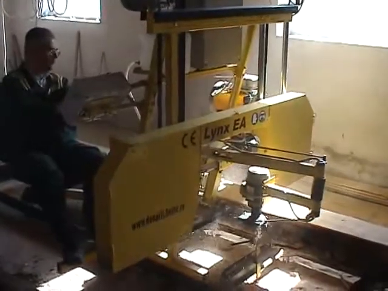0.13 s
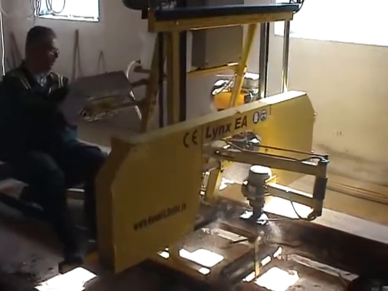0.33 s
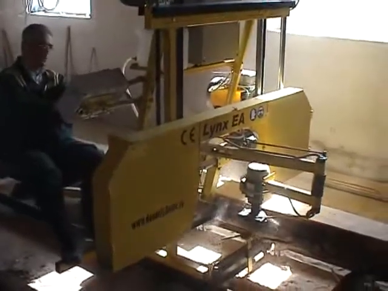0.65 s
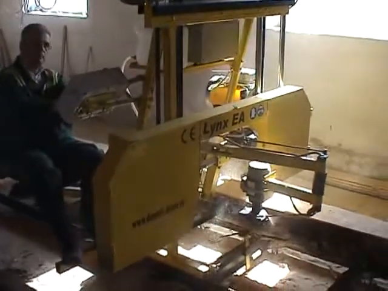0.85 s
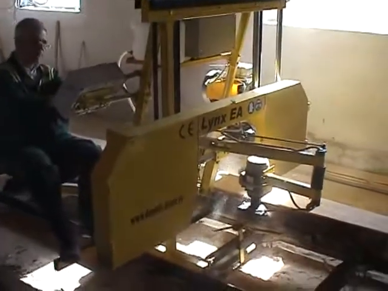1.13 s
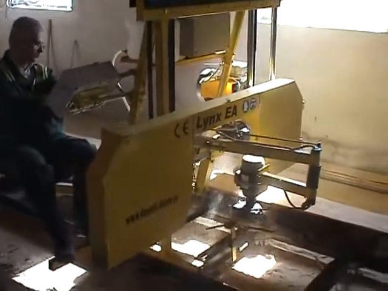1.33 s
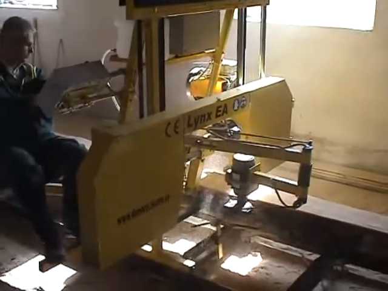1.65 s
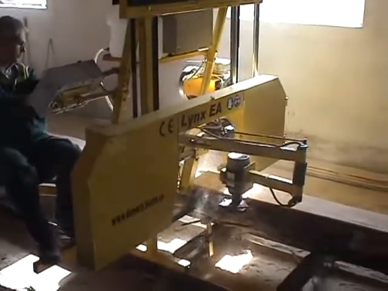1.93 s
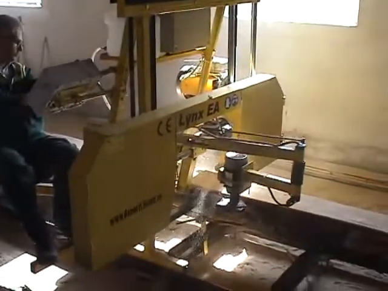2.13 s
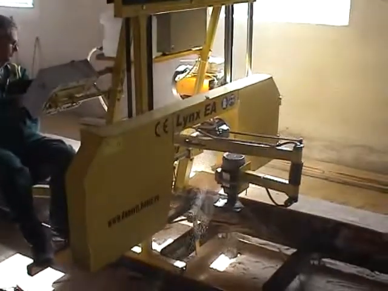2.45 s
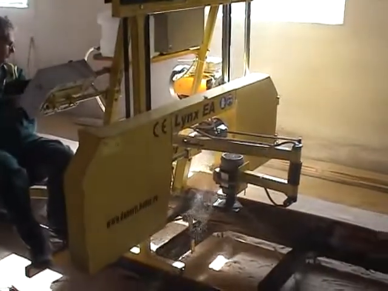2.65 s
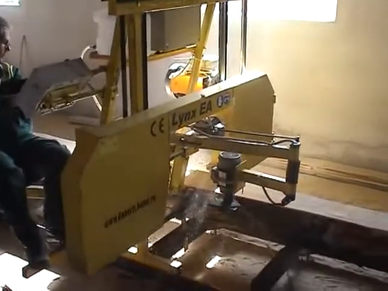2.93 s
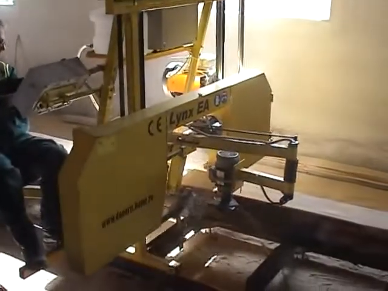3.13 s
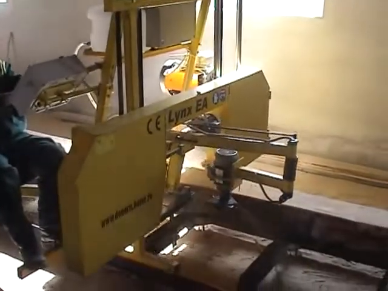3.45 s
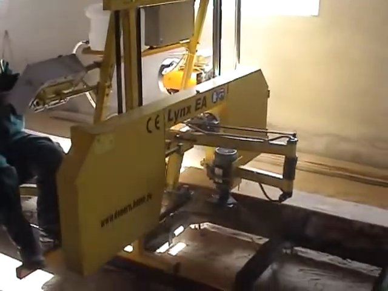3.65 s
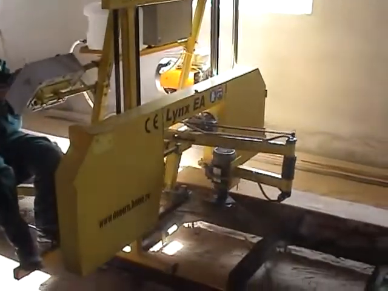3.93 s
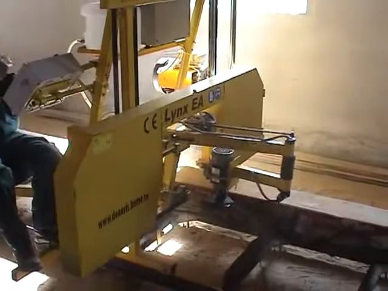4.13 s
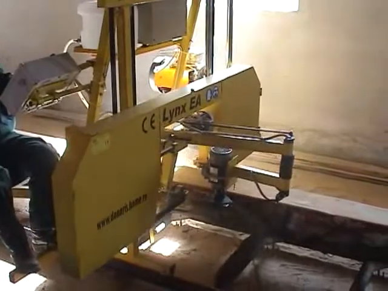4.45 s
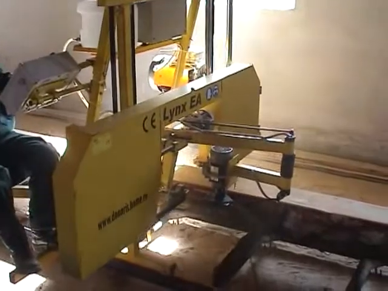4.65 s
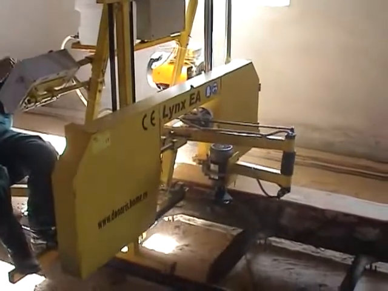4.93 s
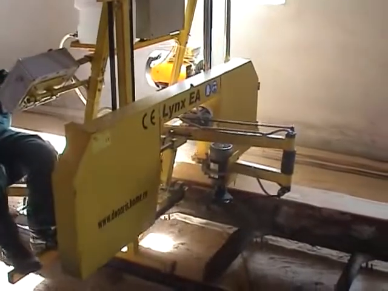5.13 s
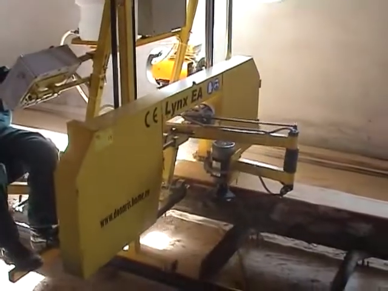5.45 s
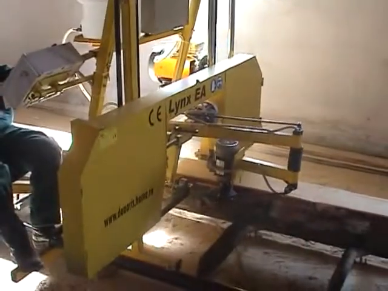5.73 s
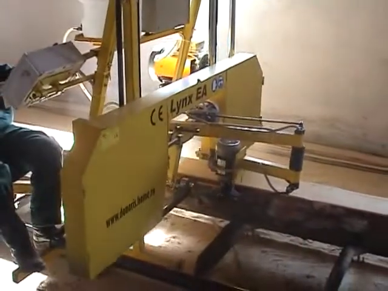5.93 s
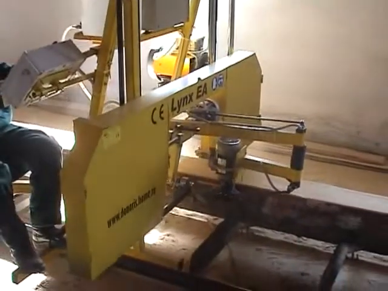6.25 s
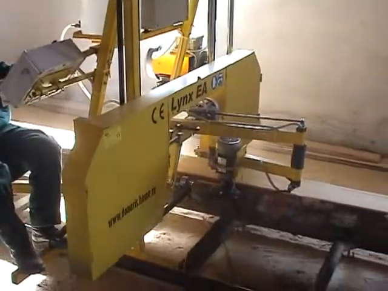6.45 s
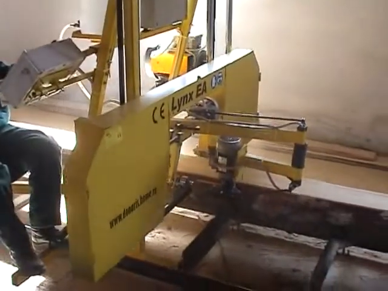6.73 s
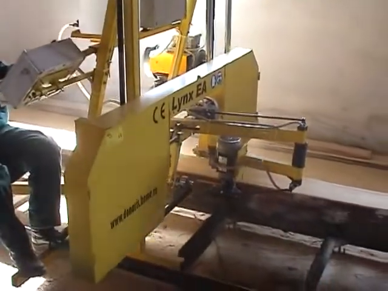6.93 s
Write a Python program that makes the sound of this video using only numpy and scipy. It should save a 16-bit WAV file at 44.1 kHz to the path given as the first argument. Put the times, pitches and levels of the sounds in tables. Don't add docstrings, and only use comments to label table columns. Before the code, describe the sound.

Continuous harsh, sizzling saw hiss indoors, with thin metallic squeals flickering through it and a soft low machine hum beneath.

```python
import sys
import numpy as np
from scipy import signal
from scipy.fft import rfft, irfft, next_fast_len
from scipy.io import wavfile
from scipy.ndimage import uniform_filter1d, map_coordinates

SR = 44100
rng = np.random.default_rng(int(sys.argv[2]) if len(sys.argv) > 2 else 0)


def ratio(d):
    e = np.asarray(d, float) / 20
    return 10 ** e


def digitize_waveform(pressure):
    field = np.atleast_2d(pressure).T
    bounded = np.clip(field, -1, 1)
    quanta = np.round(bounded * 32767).astype(np.int16)
    wavfile.write(sys.argv[1], SR, quanta)


N = 313109
PAD = next_fast_len(N)
HZ = np.maximum(np.arange(PAD // 2 + 1) * SR / PAD, 1)
EARS = np.array([[1], [-1]])
TEETH_PER_TURN = 8.354
HISS_DB = -15
# frequency in Hz, level in dB.
ROLLER_SHARE = [(140, -15), (260, -30), (600, -11), (1000, -20), (1700, -8), (2600, -12.5), (3500, -5.5),
                (5500, -4), (7000, -11.5), (9000, -14.5), (14000, -16)]


def rms_one(x):
    return x / np.sqrt(np.mean(x ** 2) + 1e-20)


def over_hz(points):
    hz, db = np.transpose(points)
    return ratio(np.interp(np.log(HZ), np.log(hz), db))


def drift(rate):
    knots = rng.standard_normal(400)
    place = np.arange(N // 64 + 2) * 64 / SR * rate
    coarse = map_coordinates(knots, [place], order=3, mode="wrap")
    return np.interp(np.arange(N) / 64, np.arange(len(coarse)), coarse)


def bell(t, middle, length):
    return np.exp(-8.0 * ((t - middle) / length) ** 2)


def turns():
    # time in seconds, first roller's rate in Hz, second's lag in Hz.
    speed = [(0, 137.86, 1.0), (.2, 137.8, 1.0), (.47, 136.35, 1.1), (.72, 138.0, 1.1), (1.2, 139.05, 1.2),
             (1.68, 139.8, 1.2), (2.2, 136.35, 1.8), (2.42, 137.9, 1.3), (2.72, 137.4, 1.2),
             (3.22, 139.25, 1.5), (3.6, 138.7, 1.6), (4.45, 138.9, 1.5), (4.75, 137.35, 1.2),
             (5.4, 139.25, 1.5), (5.76, 138.1, 1.4), (6.1, 138.95, 1.6), (6.36, 138.95, 1.2),
             (6.62, 137.7, 1.0)]
    inertia_s = 0.12
    s, rate, behind = np.transpose(speed)
    t = np.arange(N) / SR
    first, lag = np.interp(t, s, rate), np.interp(t, s, behind)
    return uniform_filter1d([first, first - lag], int(inertia_s * SR), axis=1, mode="nearest")


def roller(turns_hz, size=320, count=60):
    wear_per_s = 1.903
    running = np.concatenate([np.full(SR, turns_hz[0]), turns_hz])
    angle = np.cumsum(running) / SR
    phases = np.exp(2j * np.pi * rng.random((count, size // 2 + 1)))
    rims = rms_one(irfft(phases, size))
    wear = np.arange(N + SR) / SR * wear_per_s
    old = wear.astype(int)
    share = wear % 1 * np.pi / 2
    place = (angle % 1 * size).astype(int)
    return np.cos(share) * rims[old % count, place] + np.sin(share) * rims[(old + 1) % count, place]


def hall(x):
    t60_s, hall_db = 1, -2.5
    t = np.arange(SR) / SR
    tails = rng.standard_normal((2, SR)) * ratio(-60 * t / t60_s)
    tails /= np.sqrt(np.sum(tails ** 2, axis=1, keepdims=True))
    mid, side = signal.fftconvolve(x[None], tails, mode="full", axes=1)[:, SR:SR + N]
    direct_and_hall = (x[SR:] + ratio(hall_db) * mid) / np.hypot(1, ratio(hall_db))
    return np.array([direct_and_hall, side])


def near_echoes(x, count=6):
    echo_db, shortest_ms, longest_ms, wander_ms = -18, 0.786, 5.0, 0.083
    here, out = np.arange(N), x.copy()
    highs = np.diff(x, prepend=0)
    for lag_ms in rng.uniform(shortest_ms, longest_ms, count):
        lag = (lag_ms + wander_ms * drift(1.3)) * SR / 1000
        out += ratio(echo_db) * np.interp(here - lag, here, highs)
    return out


def excitation():
    # centre in Hz, width in Hz, height in dB.
    resonances = [(307, 18, 1), (590, 37, 3), (704, 20, 4), (840, 24, 1), (1235, 29, 3), (3244, 45, 5.5),
                  (3020, 50, -1), (3120, 50, -6), (3385, 43, 7.5), (3600, 60, 1.5), (3890, 44, -3.5),
                  (4170, 120, 1), (4230, 73, -1), (5036, 25, 11), (5040, 106, -6), (5600, 300, 0.5),
                  (6570, 100, -1), (6900, 170, -1)]
    first, second = turns()
    rolling = hall(roller(first) + roller(second))
    tearing = rng.standard_normal((2, N))
    tearing[0] = rms_one(near_echoes(tearing[0]))
    peaks_db = sum(db / (1 + (2 * (HZ - hz) / width) ** 2) for hz, width, db in resonances)
    together = rfft(tearing, PAD) + over_hz(ROLLER_SHARE) * rfft(rolling, PAD)
    return together * ratio(peaks_db)


def to_ears(mid_side):
    # frequency in Hz, side minus mid in dB.
    spread = [(40, -23), (110, -18), (200, -15.5), (380, -14), (700, -11), (1400, -7.5), (2000, -12),
              (2950, -18), (3300, -6.5), (4400, -9.5), (8000, -11.5), (9600, -17.5), (15000, -43)]
    # frequency in Hz, left minus right in dB.
    left_pull = [(60, -2), (110, 2.5), (200, 0), (380, 1.5), (700, 2), (1290, 2), (2380, 0.5), (4400, 2),
                 (8120, -0.5), (15000, -1)]
    mid, side = mid_side[0], mid_side[1] * over_hz(spread)
    lean = np.sqrt(over_hz(left_pull))
    return irfft([(mid + side) * lean, (mid - side) / lean], PAD)[:, :N]


def radiator(source, spectrum, level_db, flicker_db):
    flat = np.sqrt(1 + over_hz(ROLLER_SHARE) ** 2 * 2)
    sound = rms_one(to_ears(source * over_hz(spectrum) / flat))
    return sound * ratio(level_db + flicker_db * (drift(8.8) + drift(17.0)))


def kerf_hiss(source):
    # frequency in Hz, level in dB per Hz.
    colour = [(2900, -40.5), (3100, -19), (3260, -6), (3500, -3), (4110, -0.5), (4450, -2), (5700, -0.1),
              (7250, -2.5), (7910, -2), (10500, -4.5), (12700, -7.5), (15100, -9.5), (19000, -16.5)]
    # middle in seconds, length in seconds, rise in dB.
    burst = (3.65, 0.29, 0.57)
    grows_db_per_s, spray_above_hz = 0.17, 9500
    hiss = radiator(source, colour, HISS_DB, flicker_db=0.28)
    t = np.arange(N) / SR
    middle, length, burst_db = burst
    spray_db = grows_db_per_s * t + burst_db * bell(t, middle, length)
    high_pass = signal.butter(2, spray_above_hz, "high", fs=SR, output="sos")
    top = signal.sosfiltfilt(high_pass, hiss)
    return hiss + (ratio(spray_db - np.mean(spray_db)) - 1) * top


def guards(source):
    # frequency in Hz, level in dB per Hz.
    colour = [(900, -38), (1100, -1.5), (1300, -2), (1600, 0.5), (2050, -1), (2600, 0.5), (3150, 2.5),
              (3400, -25), (3700, -33)]
    return radiator(source, colour, HISS_DB - 15, flicker_db=0.54)


def frame(source):
    # frequency in Hz, level in dB per Hz.
    colour = [(10, -6), (100, -3), (300, -2), (480, -2.5), (600, -1), (800, -1.5), (950, -1), (1100, -9.5),
              (1300, -38)]
    grows_db_per_s = 0.2
    level_db = HISS_DB - 21.5 + grows_db_per_s * np.arange(N) / SR
    return radiator(source, colour, level_db, flicker_db=0.74)


def ring_list(usual_s, count=45):
    # start in seconds, length in seconds, overtone number.
    first_rings = [(0, .27, 25), (0, .25, 30), (0, .9, 12), (.55, .45, 30), (.73, .43, 14), (.94, .9, 25),
                   (1.06, .24, 52), (1.08, .44, 24), (1.21, .36, 57), (1.22, .32, 47), (1.62, .8, 24),
                   (1.8, .5, 30), (2.17, .67, 30), (2.38, .39, 29), (2.44, .5, 25), (2.47, .6, 36),
                   (2.82, .43, 40), (3.13, .27, 27), (3.13, .39, 78), (3.33, .34, 32), (3.42, 1, 43),
                   (3.78, .44, 27), (3.91, .68, 39), (4.03, .5, 35), (4.18, .29, 38), (4.54, .35, 25),
                   (4.59, .9, 30), (5.04, .23, 12), (5.95, .55, 30), (3.1, .68, 24),
                   (0, .38, 13), (.55, .3, 13), (1.18, .6, 20), (1.25, .3, 11), (1.9, .25, 13),
                   (2.2, .2, 14), (2.22, .58, 13), (2.23, .6, 12), (3.04, .67, 20), (3.62, .27, 13),
                   (4.25, .4, 14), (4.3, .3, 12), (5.09, .9, 20), (5.4, .25, 11), (5.65, .15, 12),
                   (6.05, .5, 20), (6.06, .27, 18), (6.4, .65, 11), (6.6, .5, 16), (6.6, .4, 14),
                   (6.85, .25, 13)]
    second_rings = [(0, .35, 43), (.04, .62, 42), (.59, .74, 25), (.71, .29, 28), (.78, .22, 45),
                    (.99, .31, 49), (1.24, .26, 39), (1.33, .38, 46), (1.8, .65, 30), (2.1, .4, 31),
                    (5.17, .64, 24), (3.66, .32, 45), (3.88, .37, 33), (4.04, .29, 31), (3.18, .25, 22),
                    (4.63, .3, 45), (4.64, .57, 41), (5.14, .23, 42), (5.19, .33, 45), (5.29, .22, 39),
                    (5.3, .37, 46), (5.28, .4, 29), (5.35, .7, 30), (5.4, .25, 43), (5.87, .5, 29),
                    (6.03, .23, 50), (6.51, .43, 30), (6.59, .5, 39), (6.73, .31, 27), (6.76, .33, 34)]
    favoured = [6, 24, 24, 25, 27, 31, 36, 39, 39, 43, 52, 57, 58, 61, 66, 75, 78, 86]
    stray_db = -7
    rings = [(s, length, 0, n, 0) for s, length, n in first_rings]
    rings += [(s, length, 1, n, 0) for s, length, n in second_rings]
    for (when, longer), n in zip(rng.random((count, 2)), list(favoured) * count):
        rings.append((when * N / SR, usual_s * (1 + 1.5 * longer), 0, n, stray_db))
    return rings


def blade_rings(fade_s=0.12):
    # frequency in Hz, peak in dB.
    ring_level = [(800, -51), (1600, -45.5), (2800, -43), (3300, -31.5), (4130, -32), (4700, -32),
                  (5600, -30), (11000, -36)]
    usual_s, db_per_doubled_length = 0.35, -1.5
    rates, rings, out = turns(), ring_list(usual_s), np.zeros((2, N))
    angles = 2 * np.pi * np.cumsum(rates, axis=1) / SR
    level = np.transpose(ring_level)
    flutter_db, wobble = 2.2 * drift(16.0), 0.62 * drift(22.0)
    chance = rng.standard_normal((len(rings), 3))
    for (start, length, which, overtone, extra_db), (phase, skew, pan) in zip(rings, chance):
        peak_db = np.interp(overtone * rates.mean(), *level) + extra_db
        peak_db += db_per_doubled_length * np.log2(length / usual_s)
        begin = max(int((start - fade_s) * SR), 0)
        end = min(int((start + length + fade_s) * SR), N)
        span = np.arange(begin, end)
        swell = np.sin(np.pi * (span / SR - start + fade_s) / (length + 2 * fade_s))
        shift = 997 * overtone
        angle = overtone * angles[which, span] + 3 * phase + np.roll(wobble, shift)[span]
        tone = np.sin(angle + 0.17 * skew * EARS)
        ring_db = peak_db + np.roll(flutter_db, shift)[span] + 3.0 + (1.0 + 0.6 * pan) * EARS
        out[:, span] += ratio(ring_db) * np.abs(swell) ** 0.72 * tone
    return out


def swells(rows, rest_db):
    t = np.arange(N // 64 + 2) * 64 / SR
    power = ratio(2 * rest_db) + sum(ratio(2 * db) * bell(t, s, length) for s, length, db in rows)
    return np.interp(np.arange(N) / SR, t, 10 * np.log10(power))


def teeth():
    # middle in seconds, length in seconds, peak in dB.
    whine_swells = [(0.0, 0.11, -36), (.2, 0.17, -39.5), (.39, 0.18, -34), (.56, .1, -41),
                    (.81, 0.13, -34.5), (1.16, .22, -39), (1.41, 0.3, -37.5), (1.82, 0.11, -37.5),
                    (2.03, 0.13, -39), (2.21, 0.11, -37), (2.56, 0.48, -36), (3.16, 0.24, -39),
                    (3.44, 0.18, -40.5), (4.09, 0.1, -36.5), (4.39, 0.25, -38), (4.56, .2, -43),
                    (5.08, 0.18, -38), (5.48, 0.3, -31.5), (5.71, 0.31, -37), (6.17, 0.23, -41.5),
                    (6.45, .12, -41), (6.64, .2, -43), (7.05, 0.23, -37)]
    octave_swells = [(.2, 0.38, -34), (.55, .16, -34.5), (.8, 0.088, -40), (.94, 0.25, -34),
                     (1.28, .1, -35), (1.7, 0.37, -40), (2.08, 0.09, -35), (2.27, 0.091, -29.5),
                     (2.93, .15, -34), (3.6, .36, -33), (3.9, 0.47, -36), (4.38, .2, -41), (5.16, .3, -41),
                     (5.64, 0.24, -36), (5.78, .1, -34), (6.15, .3, -43), (6.43, .08, -40)]
    whine_db = swells(whine_swells, rest_db=-48) + 5.0 + 1.3 * drift(24.0)
    whine_db = whine_db + (1.6 + 1.2 * drift(1.5)) * EARS
    octave_db = swells(octave_swells, rest_db=-44) + 1.3 * drift(20.0) + 0.51 * EARS
    phase = 2 * np.pi * np.cumsum(TEETH_PER_TURN * turns()[0]) / SR
    whine = np.sin(phase + 0.4 * drift(10.0) + 0.45 * drift(1.5) * EARS)
    octave = np.sin(2 * phase + 0.8 * drift(16.0) + 0.15 * drift(1.3) * EARS)
    return ratio(whine_db) * whine + ratio(octave_db) * octave


def hum():
    orders = [1, TEETH_PER_TURN / 4, TEETH_PER_TURN / 2, 5.06]
    levels_db = [-55.5, -58.5, -49.5, -56]
    angle = 2 * np.pi * np.cumsum(turns()[0]) / SR
    out = np.zeros(N)
    for order, db in zip(orders, levels_db):
        out += ratio(db + 4.5 * drift(2.47)) * np.sin(order * angle + 0.83 * drift(7.3))
    return out


def scene():
    source = excitation()
    noise = kerf_hiss(source) + guards(source) + frame(source)
    return noise + blade_rings() + teeth() + hum()


def low_pass(x):
    return signal.sosfilt(signal.butter(12, 15765, fs=SR, output="sos"), x)


def record(dry):
    return low_pass(dry)


dry = scene()
out = record(dry)
digitize_waveform(out)
```